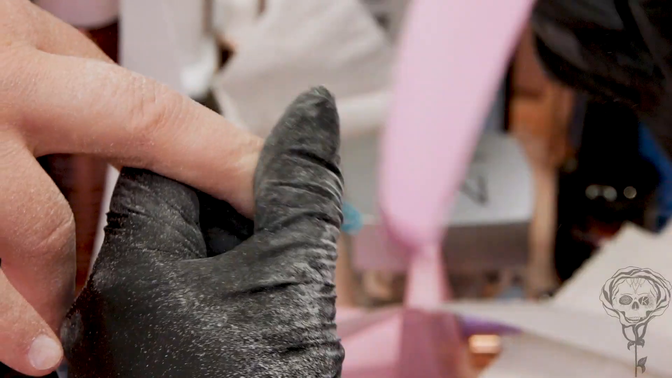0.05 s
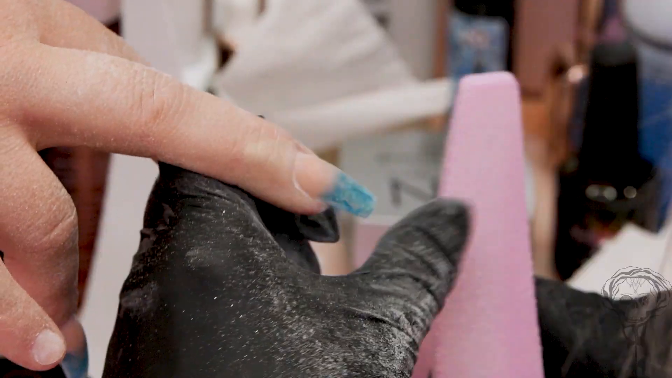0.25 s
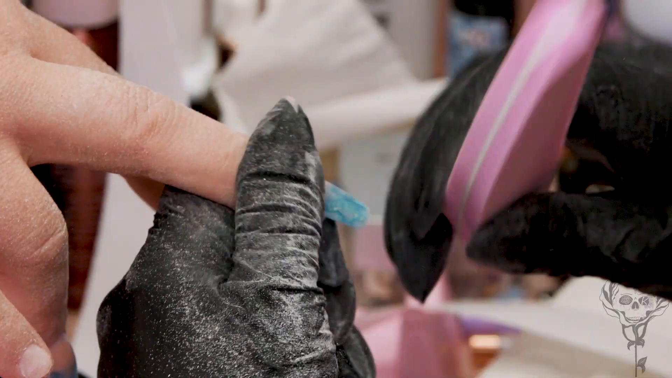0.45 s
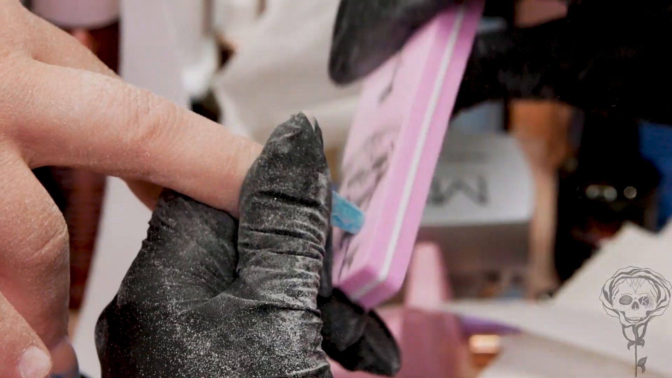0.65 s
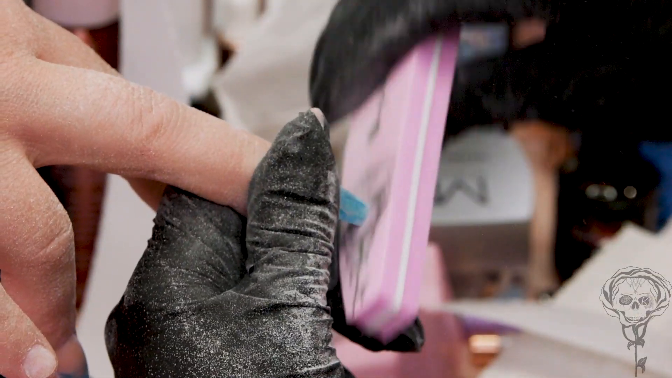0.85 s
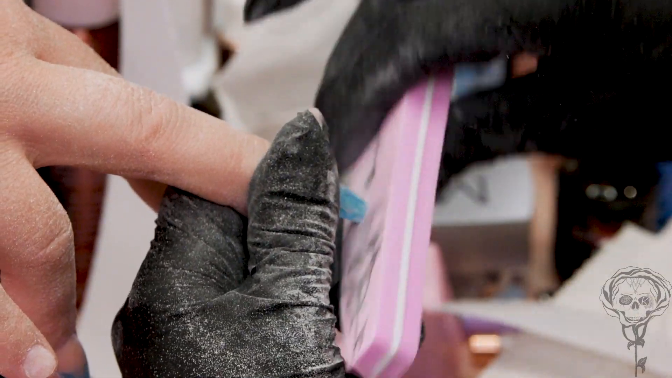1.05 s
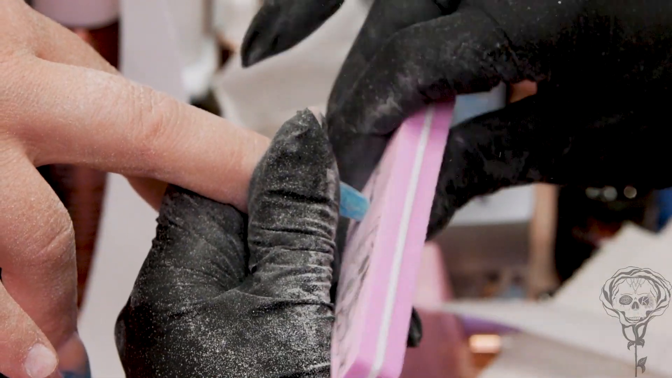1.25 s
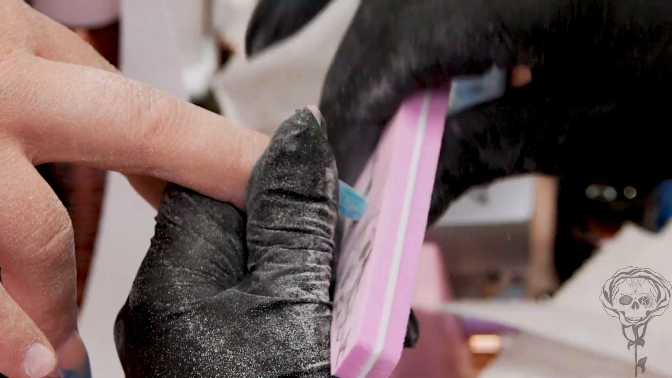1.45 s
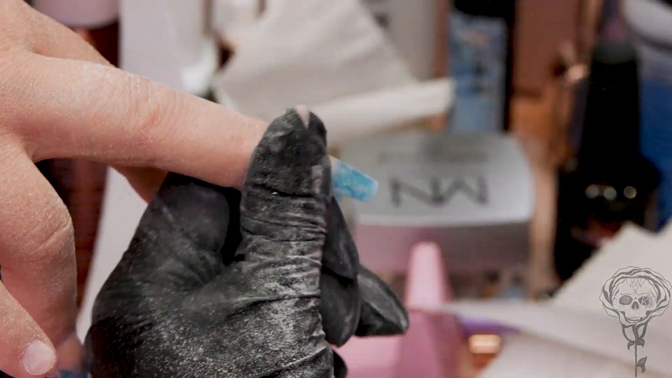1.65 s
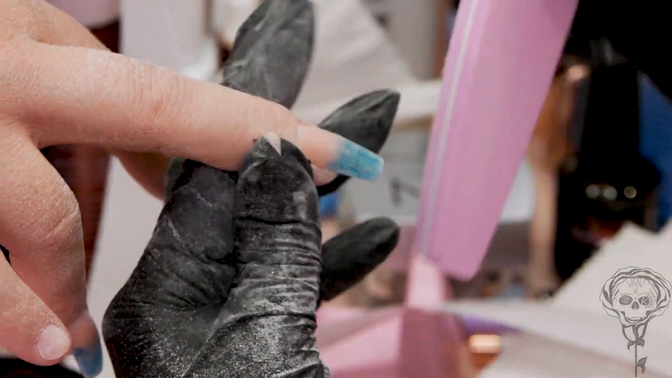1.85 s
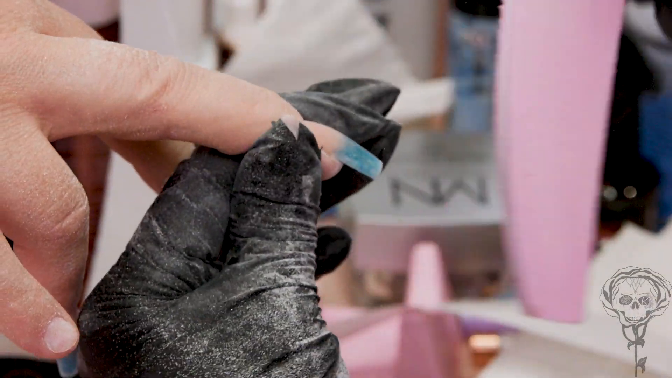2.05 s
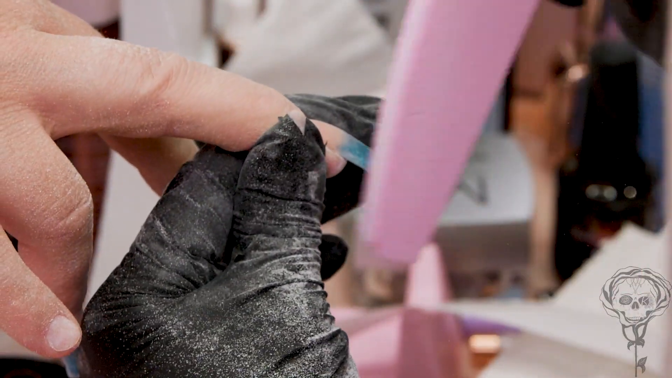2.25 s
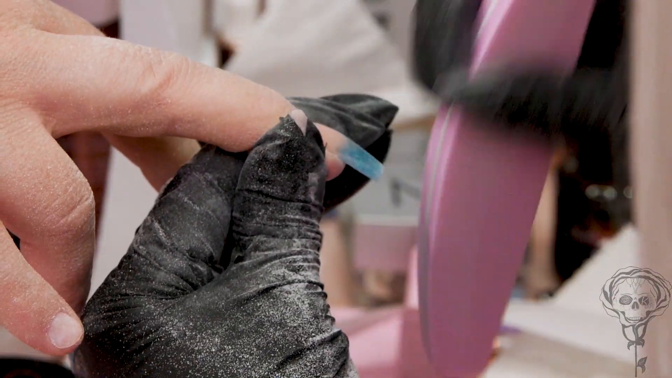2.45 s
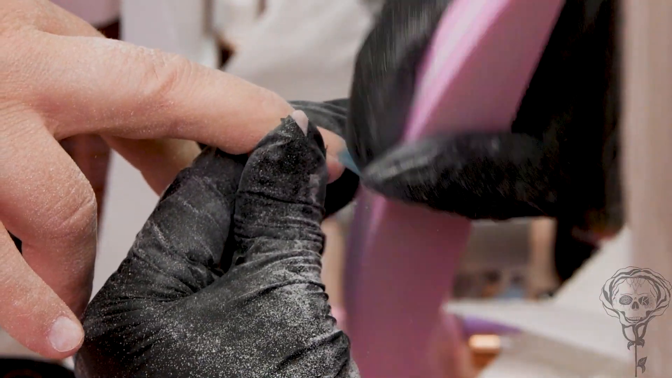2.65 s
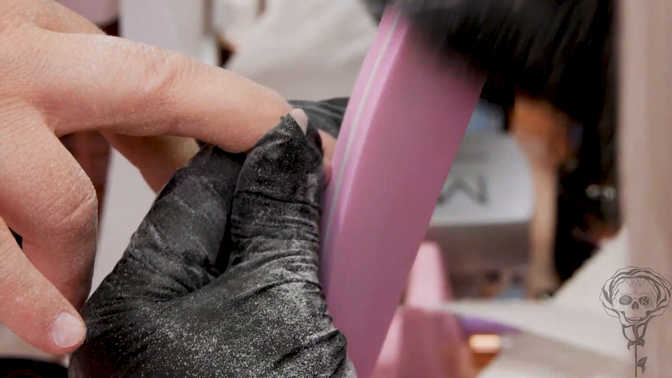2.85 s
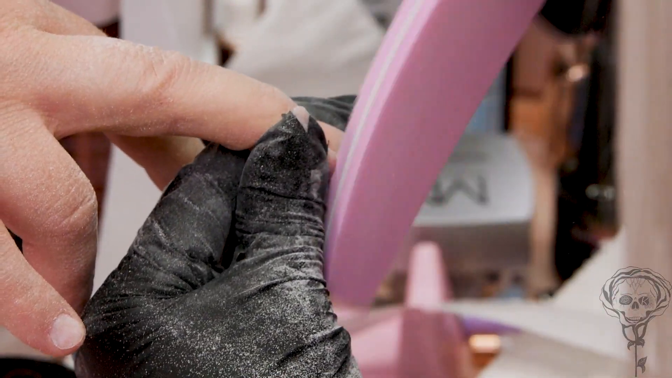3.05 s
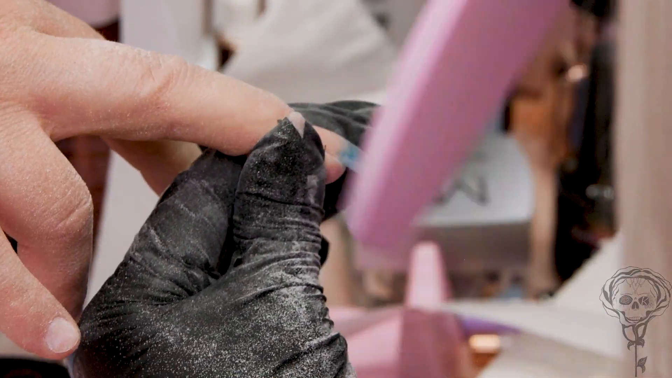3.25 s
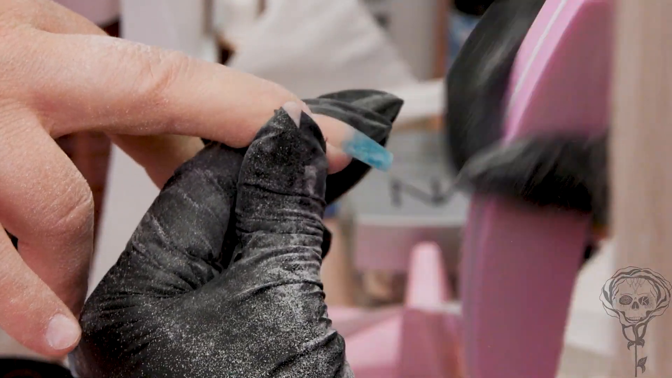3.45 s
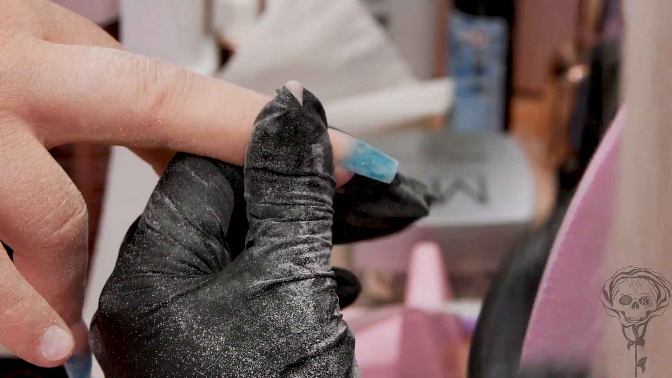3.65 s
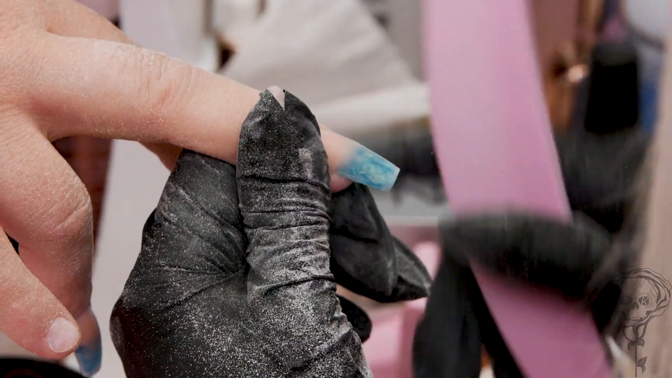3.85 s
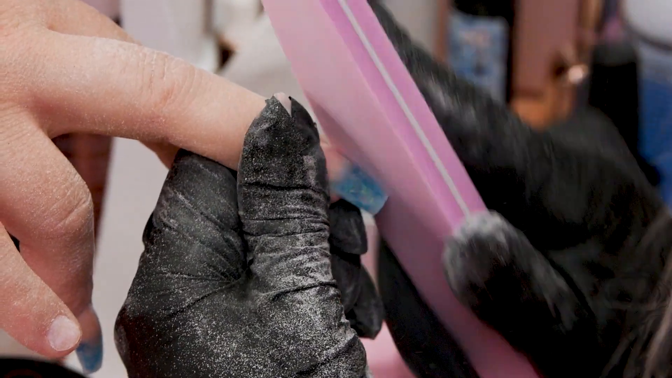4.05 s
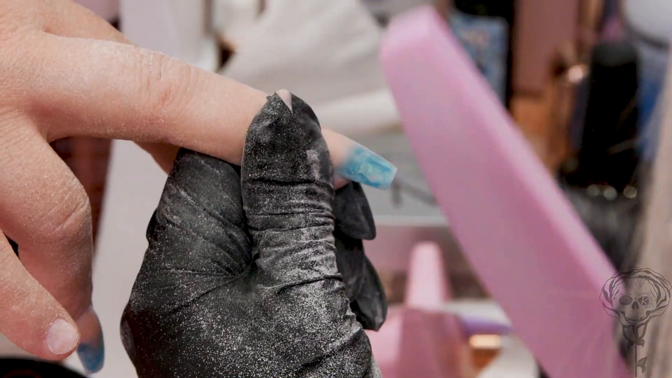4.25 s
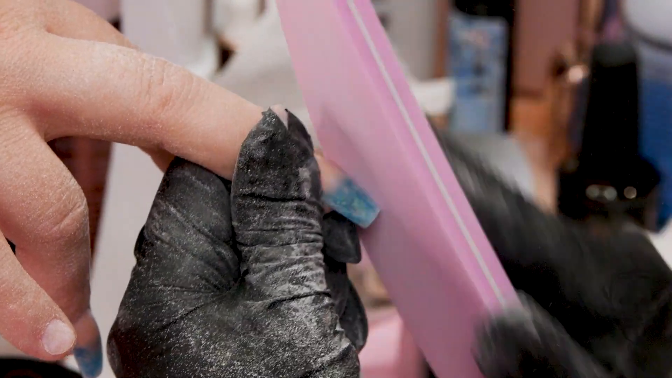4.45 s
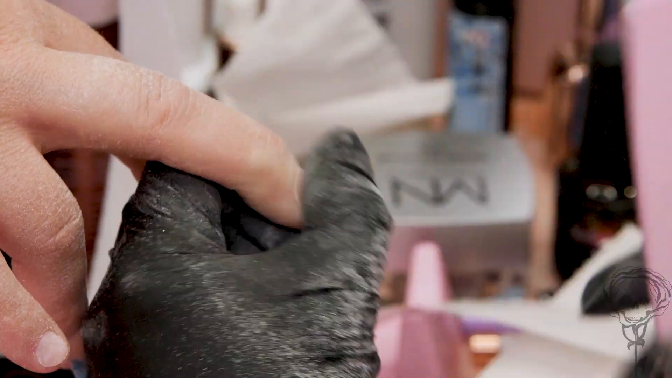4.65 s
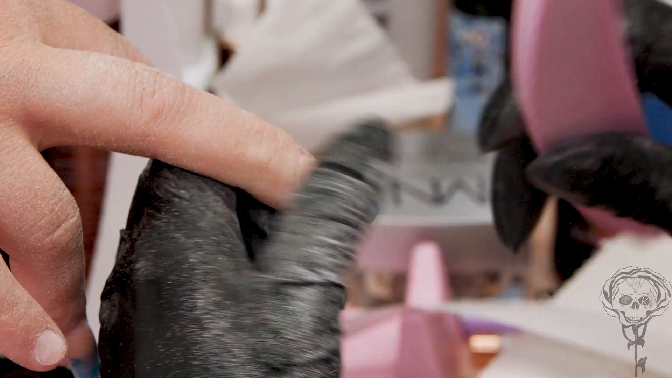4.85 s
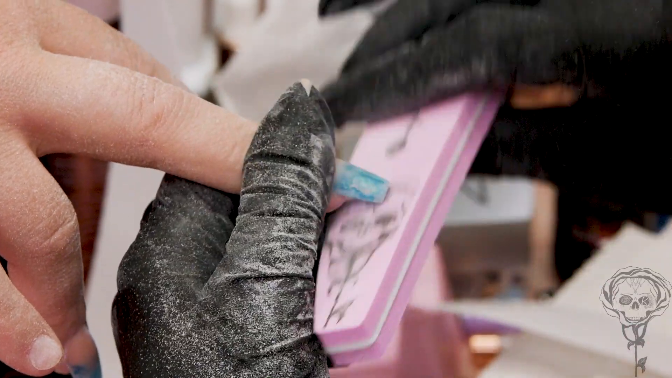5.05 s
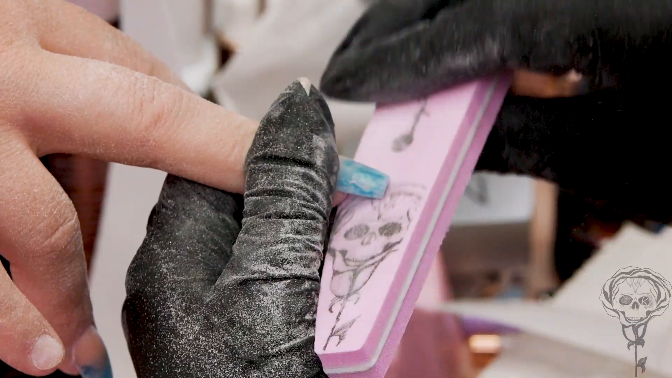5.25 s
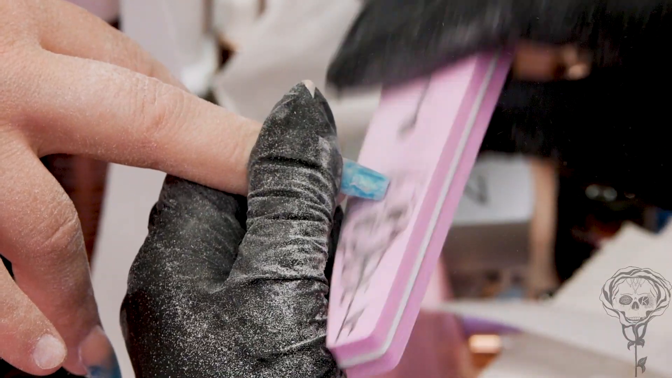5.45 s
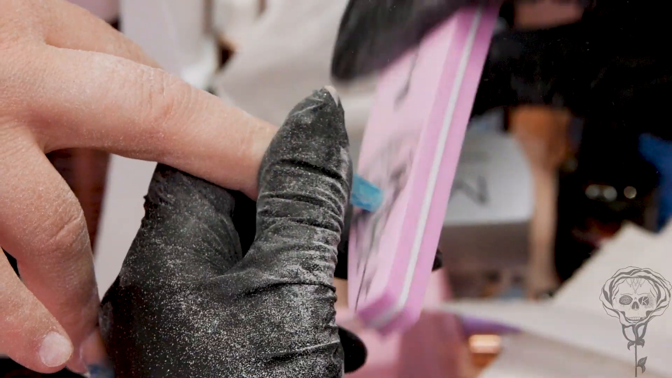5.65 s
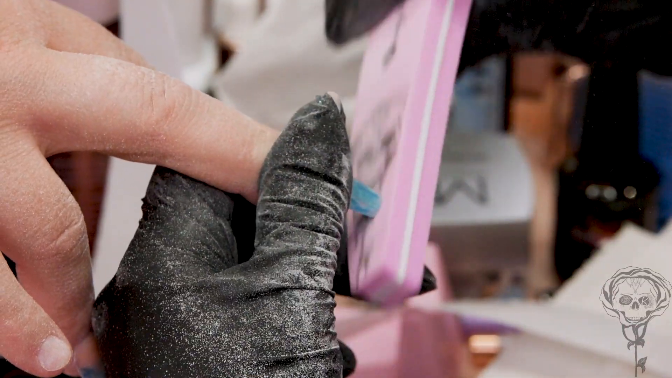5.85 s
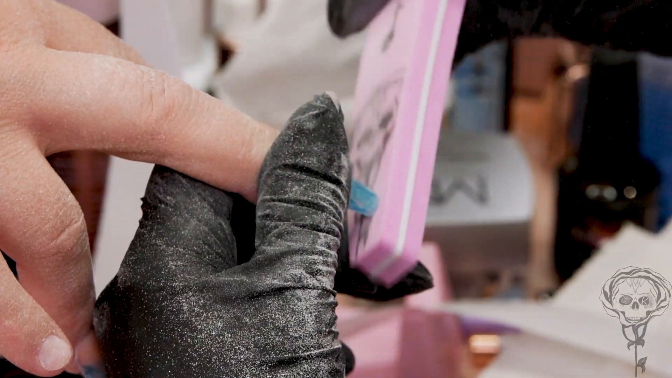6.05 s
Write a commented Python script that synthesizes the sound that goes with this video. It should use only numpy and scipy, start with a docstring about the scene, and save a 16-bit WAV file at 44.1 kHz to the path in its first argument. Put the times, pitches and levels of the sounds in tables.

```python
"""The work table takes a soft bump as a foam buffer block starts to rasp over a fingernail, close up in a salon.
Each stroke is a dense crackle of grit snaps, coloured by how the block is held and combed by near reflections.
Quick scrubbing gives way to slow swipes, one sharper table knock and loose passes, then scrubbing again.
Mostly between strokes, gloves rustle as a fainter, sparser crackle; small taps ring the nail.
A short diffuse room follows the hands, and filtered noise makes the still air."""
import sys
import numpy as np
from scipy import signal
from scipy.fft import rfft, irfft
from scipy.io import wavfile

SR = 44100
rng = np.random.default_rng(int(sys.argv[2]) if len(sys.argv) > 2 else 0)


def digitize_waveform(pressure):
    """Quantize a signal to 16-bit integers and store it at the path in sys.argv[1].

    Rows of a 2-D input are taken as channels; values are limited to [-1, 1].
    """
    field = np.atleast_2d(pressure).T
    bounded = np.clip(field, -1, 1)
    quanta = np.round(bounded * 32767).astype(np.int16)
    wavfile.write(sys.argv[1], SR, quanta)


N = 269230

# Rasp colours that the table of holds picks from, one for each way of holding the block:
# pitch_hz, relative level_db (per Hz)
SIDE_EDGE = [(160, -64), (280, -32), (513, -18), (1020, -28), (1970, -17), (2290, -6.5), (2810, -10.5),
             (3550, -1.5), (3860, -7.5), (4570, 3.5), (5320, -1), (5780, 0.5), (9420, -10.5), (12100, -8.5),
             (15600, -18)]
# pitch_hz, relative level_db (per Hz)
FAR_EDGE = [(160, -85), (280, -53), (299, -54), (405, -33), (464, -27.5), (1060, -27), (1530, -15),
            (2000, -12.5), (2370, -4), (2810, -2.5), (3100, -13), (3610, -1), (7080, -10), (11900, -11.5),
            (15600, -22)]
# pitch_hz, relative level_db (per Hz)
NAIL_TOP = [(160, -78), (280, -43), (660, -28.5), (894, -34), (1530, -16), (2000, -22.5), (2490, -11.5),
            (3380, -5.5), (3860, -6), (4340, -2.5), (4730, -5), (6840, -5.5), (8810, -10), (12700, -10.5),
            (15600, -16)]
# pitch_hz, relative level_db (per Hz)
NAIL_TIP = [(160, -50), (280, -30), (649, -14.5), (1020, -28.5), (1480, -15), (2000, -14.5), (2250, -6),
            (3380, -2.5), (3730, -9.5), (4270, 1), (5140, -3.5), (5780, -1), (7200, 1.5), (11900, -10.5),
            (15600, -21)]
# pitch_hz, relative level_db (per Hz)
FLAT_FACE = [(160, -72), (280, -47.5), (504, -17), (808, -27), (1360, -19), (1690, -18), (2250, -13.5),
             (2710, -5), (3490, -4), (3800, -5.5), (4490, 2), (5690, -0.5), (9420, -12.5), (12100, -10.5),
             (15600, -17)]


def buffer_block():
    """The block rubs the nail in separate strokes, each with its own level and lean."""
    # rubs: start_s, end_s, level_db, lean (-1 pushing to +1 pulling)
    strokes = [(0.034, 0.122, -38.5, .6), (0.43, 0.535, -36, -.1), (0.547, 0.656, -32, 1),
               (0.662, 0.773, -33, -.4), (0.777, 0.884, -32.5, .8), (0.889, 0.997, -32.5, -.8),
               (1.003, 1.111, -35.5, .9), (1.115, 1.217, -31, -.8), (1.224, 1.333, -38, .5),
               (1.338, 1.472, -32.5, -.9), (2.121, 2.272, -34.7, .4), (2.39, 2.536, -34.5, .3),
               (2.641, 2.788, -34.3, .1), (2.877, 3.018, -34.5, .1), (3.012, 3.043, -41.5, 0),
               (3.121, 3.264, -33.8, -.2), (3.497, 3.592, -39, -.1), (3.852, 4.076, -33, 0),
               (4.247, 4.412, -33, -.5), (4.897, 5.003, -38.7, -.8), (5.018, 5.126, -37.3, 1),
               (5.133, 5.236, -35.7, -.8), (5.241, 5.344, -35.5, .7), (5.364, 5.463, -34, -.5),
               (5.467, 5.569, -38.3, .5), (5.572, 5.682, -37, -.1), (5.684, 5.793, -37, .2),
               (5.79, 5.898, -37, 0), (5.9, 6.009, -37, .3), (6.004, 6.112, -38, -.1)]
    out = np.zeros(N)
    for row in strokes:
        add(out, row[0], stroke(*row))
    return out


def stroke(start_s, end_s, level_db, lean, size=16384):
    """One pass of the grit: the fizz follows its speed, the body of the rasp follows the pressure on the nail."""
    # holds: from_s, colour, echo_ms, echo strength (0-1), block edge resonance_hz, width_hz, level_db
    holds = [(0, SIDE_EDGE, 0.7, 0.11, 2270, 296, 3.1), (2, FAR_EDGE, 0.98, 0.077, 3420, 398, 1.7),
             (3.4, NAIL_TOP, 0.94, 0.15, 2520, 400, 1.8), (4.8, NAIL_TIP, 0.69, 0.085, 1400, 396, 4.9),
             (5.46, FLAT_FACE, 0.57, 0.085, 2288, 298, 11)]
    # hand motion: from_s, crest place (0-1), pointedness of pressure, pointedness of speed,
    # lag (share of the stroke; pressure trails speed by about 0.9 of it)
    motions = [(0, .24, 0.92, 1.2, -0.039), (.4, 0.43, 1, 1.24, -0.037), (2, 0.51, 1.34, 0.9, 0.17),
               (3.4, 0.33, 0.68, 0.97, -0.11), (3.8, 0.45, 1.2, 1.1, -0.1), (4.2, 0.57, 0.76, 0.79, 0.066),
               (4.8, 0.44, 1.3, 1.45, -0.057)]
    # pulling thins the rasp, pushing fills it: pitch_hz, change at full pull_db
    pull_colour = [(1450, 2), (2800, -1.5), (5000, 1.5), (9500, 5)]
    # narrow resonances of the nail under the grit: centre_hz, width_hz, level_db
    nail_peaks = [(3500, 88, 4), (4130, 150, 2.5), (4464, 110, 2.5), (4690, 130, 1.5), (5800, 96, 3.5),
                  (5980, 90, 1.5)]
    colour, echo_ms, echo, *edge = current(holds, start_s)
    crest, pressure_pointed, speed_pointed, lag = current(motions, start_s)
    lag = lag + 0.06 * lean  # pulling delays the pressure against the speed, pushing advances it

    hz = bins(size)
    shape_db = at_hz(colour, hz) + np.clip(lean, -1, 1) * at_hz(pull_colour, hz)
    for centre_hz, width_hz, peak_db in [*nail_peaks, edge]:
        shape_db += peak_db / (1 + (2 * (hz - centre_hz) / width_hz) ** 2)

    # direct sound plus reflections, which comb the rasp
    near_echo = echo * np.exp(-2j * np.pi * hz * echo_ms / 1000)
    paths = 1 + near_echo + scatter(hz, strength=0.19, earliest_ms=0.949, latest_ms=6.0)
    snaps = grit(size, per_s=18000, spread_db=4.0, catch_db=1.45, catch_hz=160)
    rasp = rms_one(irfft(rfft(snaps) * from_db(shape_db) * paths))
    body = coloured(rasp, [(4700, -1), (6300, -3.5), (9000, -34)])
    fizz = rasp - body

    count = min(round((end_s - start_s) * SR), size)
    progress = np.linspace(0, 1, count)
    pressure = arch(progress, crest + 0.26 * lag, pressure_pointed)
    speed = arch(progress, crest - 0.64 * lag, speed_pointed)
    return from_db(level_db) * (body[:count] * pressure + fizz[:count] * speed)


def grit(size, per_s, spread_db, catch_db, catch_hz):
    """Tiny snaps of uneven size, swelling in clumps as the surface catches and slips."""
    happens = rng.random(size) < per_s / SR
    polarity = rng.choice([-1, 1], size)
    snaps = happens * polarity * from_db(spread_db * rng.standard_normal(size))
    catching = rms_one(butter(rng.standard_normal(size), catch_hz, "low", order=2))
    return rms_one(snaps * from_db(catch_db * catching))


def scatter(hz, strength, earliest_ms, latest_ms, count=8):
    """Small reflections off fingers and tools, as delayed copies that shift from stroke to stroke."""
    delays_s = rng.uniform(earliest_ms, latest_ms, (count, 1)) / 1000
    polarity = rng.choice([-1, 1], (count, 1))
    return strength * np.sum(polarity * np.exp(-2j * np.pi * hz * delays_s), axis=0)


def taps():
    """The block touches or leaves the nail: filtered clicks set nail and fingertip modes ringing."""
    # contacts: start_s, click level_db before filtering, softness (low-pass_hz), lightness (high-pass_hz)
    contacts = [(0.202, -42, 7000, 3500), (0.35, -38.5, 9000, 3500), (1.444, -36, 1390, 60),
                (2.241, -39, 2200, 500), (2.392, -38.5, 3500, 99.96), (2.645, -42.5, 6000, 500),
                (2.873, -44, 11500, 1800), (3.116, -42, 12000, 1200), (4.251, -43, 2500, 398)]
    # nail and fingertip: pitch_hz, level_db, t60_s
    nail_modes = [(145, -28, 0.13), (260, -33, 0.078), (684, -21, 0.022), (1560, -7.5, 0.026),
                  (2600, -10, 0.014), (4450, -7.5, 0.021), (7400, -7, 0.011)]
    touches = np.zeros(N)
    for start_s, level_db, soft_hz, light_hz in contacts:
        softened = butter(click(start_s, level_db), soft_hz, "low", order=1)
        touches += butter(softened, light_hz, "high", order=2)
    return ring(touches, nail_modes)


def gloves():
    """Rubber creeps over skin and foam in short scuffs, with a faint, sparser crackle."""
    # gloves shifting their grip: start_s, end_s, level_db at the crest
    scuffs = [(0.103, 0.286, -63.5), (0.267, 0.387, -57.5), (0.402, 0.46, -53.5), (1.452, 1.533, -56.5),
              (1.522, 1.602, -50), (1.59, 1.683, -58.5), (1.652, 1.79, -57), (1.78, 1.886, -56),
              (1.864, 1.973, -60.5), (1.966, 2.094, -62.5), (2.262, 2.33, -66), (3.253, 3.349, -66.5),
              (3.624, 3.669, -55), (3.66, 3.745, -51), (4.425, 4.496, -48.5), (4.475, 4.571, -50.5),
              (4.565, 4.639, -55.5), (4.687, 4.794, -60.5), (4.795, 4.925, -66.5)]
    # glove crackle: pitch_hz, relative level_db (per Hz)
    glove_colour = [(180, -48), (300, -58), (366, -4.5), (518, -31), (850, -22), (908, -11), (1540, -14),
                    (2530, -1.5), (5240, 5), (15600, -12)]
    level = np.zeros(N)
    for start_s, end_s, level_db in scuffs:
        progress = np.linspace(0, 1, round((end_s - start_s) * SR))
        add(level, start_s, from_db(level_db) * arch(progress, crest=0.44, pointed=0.87))
    crackle = grit(N, per_s=9000, spread_db=2.5, catch_db=1.94, catch_hz=70.4)
    return level * rms_one(coloured(crackle, glove_colour))


def knocks():
    """A softer contact drives mostly the low modes of the table; the room booms on after the table has stopped."""
    # blows on the table: start_s, click level_db before filtering, softness (low-pass_hz), lightness (high-pass_hz)
    table_blows = [(0.037, -23, 333, 30), (3.5038, -16, 1844, 138.8)]
    # table top: pitch_hz, level_db, t60_s
    table_modes = [(109, -10, 0.052), (197.2, 2, 0.05), (400, -9, 0.064), (536, 3.5, 0.028),
                   (1049, 2, 0.012), (1230, -5, 0.017), (1478, -5, 0.032), (1800, -12.5, 0.049)]
    # standing waves of the room: pitch_hz, level_db, t60_s
    room_modes = [(89, -20, 0.3), (144, -25, 0.42), (177.7, -12, 0.26), (237, -13.5, 0.25),
                  (353.5, -15.5, 0.18), (402, -20.5, 0.26)]
    # diffuse sound that the room returns of a blow: pitch_hz, level_db
    boom_colour = [(40, 9), (90, 26), (200, 33.5), (320, 26.5), (500, 32.5), (750, 25), (1400, 24.5),
                   (2000, 18.5), (3000, 10.5), (6000, 11)]
    blows = np.zeros(N)
    for start_s, level_db, soft_hz, light_hz in table_blows:
        softened = butter(click(start_s, level_db), soft_hz, "low", order=3)
        blows += butter(softened, light_hz, "high", order=2)
    table = ring(blows, table_modes)
    wall = from_db(-12) * butter(later(table, delay_s=0.036), 350, "low", order=2)
    standing_waves = ring(later(blows, delay_s=0.018), room_modes)
    boom = standing_waves + room(blows, boom_colour, t60_s=0.33, gap_s=0.007)
    return butter(table + wall + boom, 74, "high", order=4)


def room(x, colour, t60_s, gap_s):
    """Diffuse reflections of a small room: a decaying coloured-noise tail after a short gap."""
    t = np.arange(SR // 2) / SR
    decay = from_db(-60 * t / t60_s)
    tail = coloured(rng.standard_normal(len(t)), colour) * decay
    tail /= np.sqrt(np.sum(decay ** 2))  # the colour alone sets the energy
    return signal.fftconvolve(x, np.pad(tail, (round(gap_s * SR), 0)))[:N]


def still_air():
    """The quiet salon as steady noise with a coloured spectrum."""
    # room tone: pitch_hz, relative level_db (per Hz)
    air_colour = [(25, 1), (70, -4), (160, -6.5), (290, -14), (400, -4), (600, -2.5), (850, -10),
                  (1300, -10), (2000, -10), (4500, -9.5), (9000, -13.5), (15000, -15)]
    return from_db(-68) * rms_one(coloured(rng.standard_normal(N), air_colour))


def ring(clicks, modes):
    """Every click sets the modes of a body ringing, each a decaying sine from a two-pole resonator."""
    out = np.zeros(N)
    for pitch_hz, level_db, t60_s in modes:
        radius = from_db(-60 / (t60_s * SR))  # decay per sample
        angle = 2 * np.pi * pitch_hz / SR
        feed = [0, from_db(level_db) * np.sin(angle)]
        feedback = [1, -2 * radius * np.cos(angle), radius * radius]
        out += signal.lfilter(feed, feedback, clicks + 1e-18)  # tiny offset avoids denormal numbers
    return out


def click(start_s, level_db):
    """One impulse at a given time."""
    out = np.zeros(N)
    out[round(start_s * SR)] = from_db(level_db)
    return out


def arch(progress, crest, pointed):
    """A swell from 0 to 1 and back, with its top at the crest."""
    warp = np.log(0.5) / np.log(np.clip(crest, 0.1, 0.9))  # moves the middle of the sine to the crest
    return np.abs(np.sin(np.pi * progress ** warp)) ** max(pointed, 0.2)


def current(rows, s):
    """The settings in force at a given time."""
    return [row for row in rows if row[0] <= s][-1][1:]


def add(out, start_s, sound):
    """Lay a sound into a track at a given time."""
    at = round(start_s * SR)
    out[at:at + len(sound)] += sound[:len(out) - at]


def later(x, delay_s):
    """The same signal, delayed."""
    return np.pad(x, (round(delay_s * SR), 0))[:N]


def butter(x, hz, kind, order):
    """A causal low-pass or high-pass."""
    sos = signal.butter(order, min(hz, 0.45 * SR), kind, fs=SR, output="sos")
    return signal.sosfilt(sos, x + 1e-18)  # tiny offset avoids denormal numbers


def coloured(x, spectrum):
    """A signal filtered by a (Hz, dB) curve."""
    return irfft(rfft(x) * from_db(at_hz(spectrum, bins(len(x)))), len(x))


def at_hz(points, hz):
    """A spectrum read on a log-frequency axis, in dB."""
    points = np.array(points)
    return np.interp(np.log(hz + 1), np.log(points[:, 0]), points[:, 1])


def bins(size):
    """Frequencies of a real FFT, in Hz."""
    return np.arange(size // 2 + 1) * SR / size


def from_db(db):
    """Decibels as a gain."""
    return 10 ** (np.asarray(db) / 20)


def rms_one(x):
    """The same signal at rms 1."""
    return x / np.sqrt(np.mean(x ** 2) + 1e-20)


def scene():
    """Hands with their room, table and still air, all at one microphone."""
    hands = buffer_block() + gloves() + taps()
    room_colour = [(500, -11.5), (4000, -15.0), (7000, -18), (14000, -22.5)]  # pitch_hz, level_db
    hands = hands + room(hands, room_colour, t60_s=0.22, gap_s=0.006)
    return (hands + knocks() + still_air())[None]


def record(dry):
    """A steep elliptic low-pass cuts the top above 15750 Hz."""
    sos = signal.ellip(12, 0.1, 80, 15750, fs=SR, output="sos")  # order, ripple dB, rejection dB, cut-off Hz
    return signal.sosfilt(sos, dry)


dry = scene()
out = record(dry)
digitize_waveform(out)
```